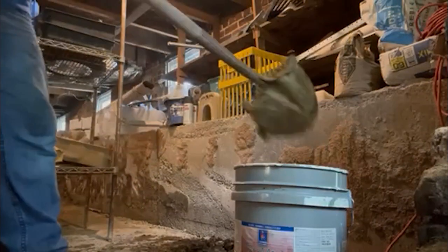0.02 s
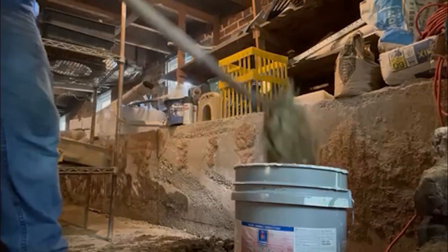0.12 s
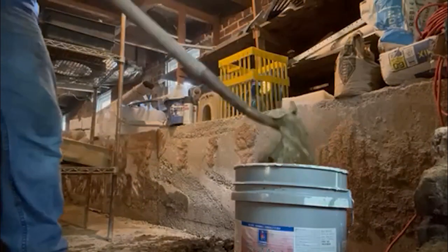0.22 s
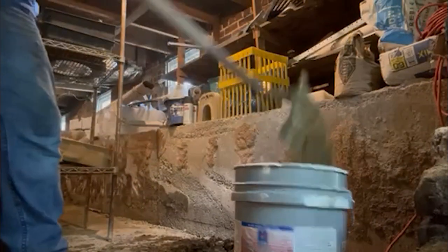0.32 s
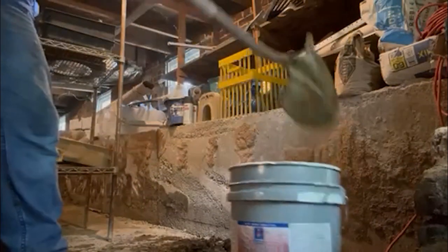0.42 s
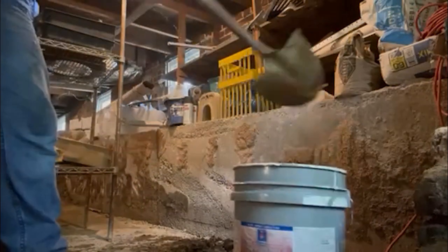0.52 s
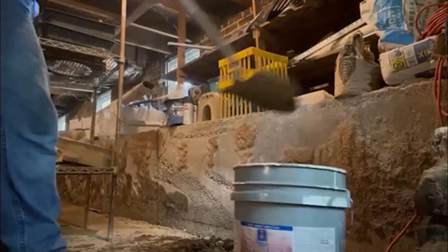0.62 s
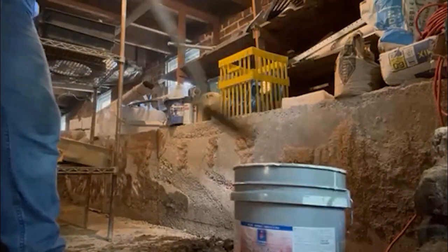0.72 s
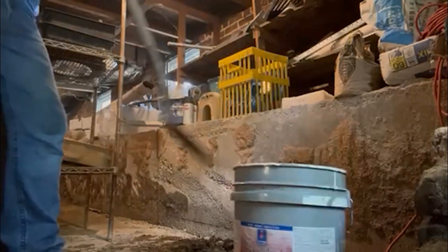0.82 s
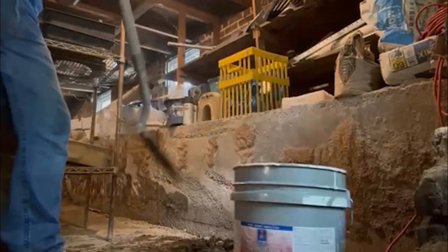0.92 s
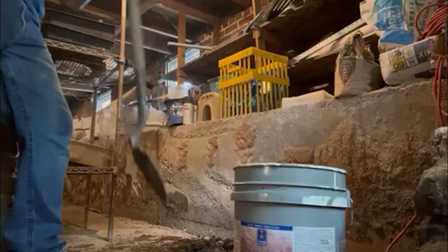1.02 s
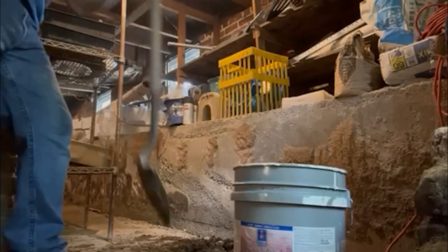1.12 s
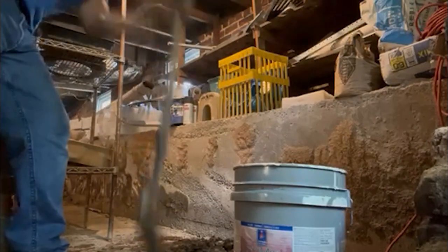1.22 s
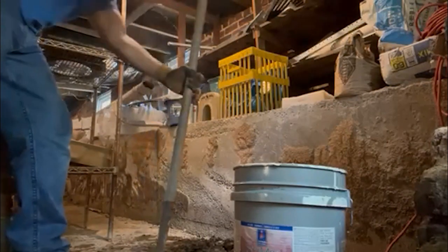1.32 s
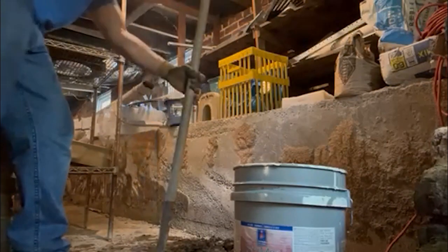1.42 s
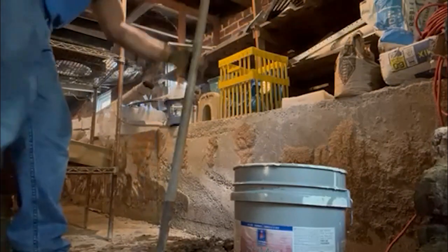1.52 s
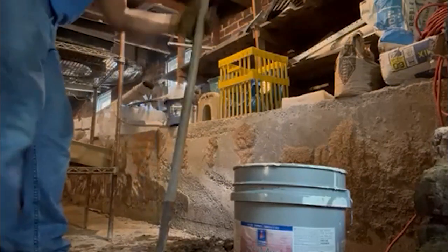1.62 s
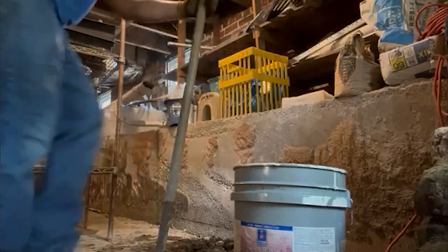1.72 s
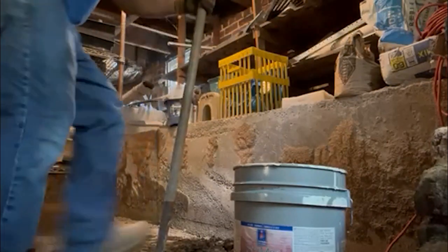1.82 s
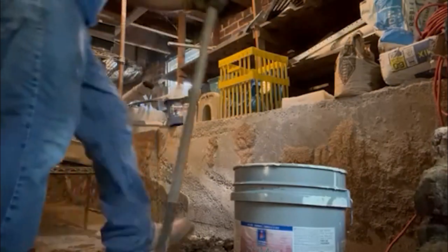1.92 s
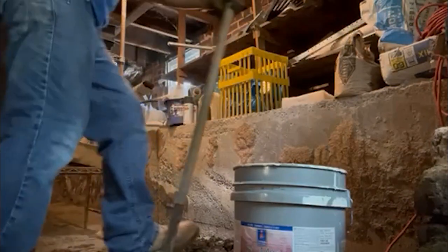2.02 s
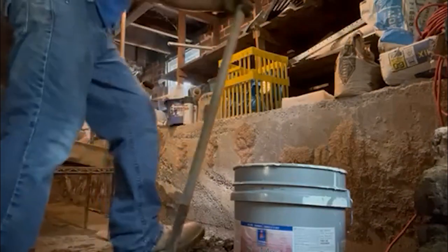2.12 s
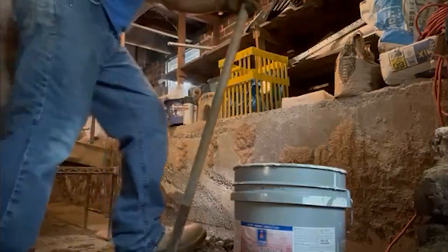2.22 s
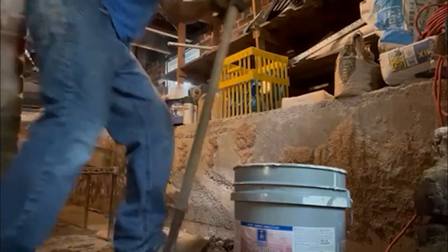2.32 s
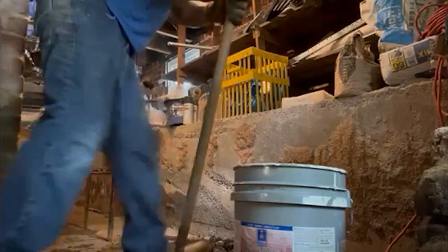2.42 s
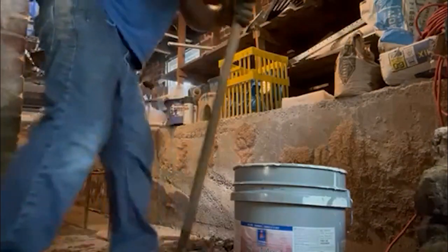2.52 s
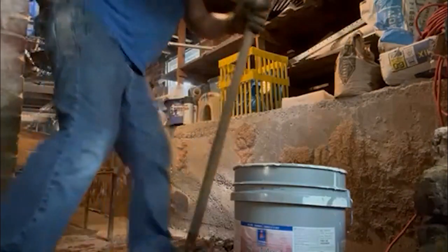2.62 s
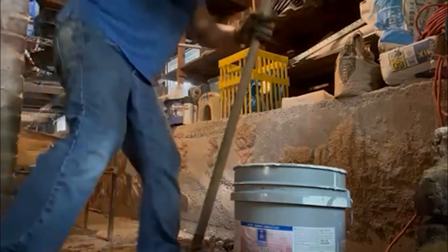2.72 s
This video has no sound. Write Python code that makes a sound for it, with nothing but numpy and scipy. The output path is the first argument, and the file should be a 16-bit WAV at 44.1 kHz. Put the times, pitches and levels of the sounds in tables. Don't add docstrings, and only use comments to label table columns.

```python
import sys
import numpy as np
from scipy import signal
from scipy.fft import rfft, irfft
from scipy.io import wavfile
from scipy.ndimage import uniform_filter1d

SR = 44100
rng = np.random.default_rng(int(sys.argv[2]) if len(sys.argv) > 2 else 0)


def voltage_ratio(level):
    return 10 ** (np.asarray(level, float) / 20)


def master(y):
    cut = np.clip(np.atleast_2d(y).T, -1, 1)
    pcm = np.round(cut * 32767)
    wavfile.write(sys.argv[1], SR, pcm.astype(np.int16))


N = 121275

# [t/s, knock level/dB, knock f/Hz, drum level/dB]
CLODS = [(0.15, -31, 770, -28.5), (0.236, -13, 640, -21.5), (0.243, -13, 785, -4), (.251, -11.5, 700, -3.5),
         (0.256, -7, 350, -4), (0.269, -5, 600, -12.5), (0.270, 0, 347, -17.5), (.289, -5.5, 670, -8),
         (0.297, -12, 600, -16.5), (0.308, -5.5, 450, -3), (0.316, -15.5, 950, -18),
         (0.324, -10, 420, -4.5), (0.33, -20, 920, -18.5), (0.339, -17.5, 1150, -26),
         (.352, -28, 500, -20.5), (.365, -13.5, 640, -23.5), (0.382, -31, 1000, -21.5),
         (0.398, -39.5, 900, -29.5), (0.448, -25.5, 650, -44), (0.466, -52, 506, -36.5),
         (.521, -19, 600, -19.5)]
# [f/Hz, level/dB, t60/s]
BUCKET_MODES = [(211.7, -1, 0.09), (274, -2.5, 0.074), (154, -27, 0.17), (419.7, -10.5, 0.054),
                (480, -9.5, 0.054)]
# [f/Hz, level/dB, t60/s]
BUCKET_AIR = (216.5, -26, .9)
# [t/s, level/dB, time until dirt smothers it/s]
BUCKET_AIR_RINGS = [
    (0.346, -5, 0.03),
    (.55, -1, 0.09),
]
SMOTHER_DB_PER_S = 500
KNOCK_CYCLES, STONE_CYCLES = 4.6, 9
CRACK_DB, CRACK_S = -13, 0.0011

# [t/s, rise/s, level/dB, fall/(dB/s), tilt/(dB/octave)]
TIP_GRIT = [
    (0.019, 0.002, -42.5, 199, -17.5),
    (0.041, 0.00086, -46.5, 1496, 2),
    (0.134, 0.017, -43, 18, -12),
    (0.23, 0.01, -23, 81, -20),
    (.29, 0.026, -30.5, 182, -13),
    (0.399, 0.047, -52, 7, -23.5),
    (0.518, 0.0054, -52, 132, -4.5),
    (0.586, 0.021, -59.5, 152, -4),
    (0.68, 0.044, -74, 38, -9.5),
]
# [t/s, rise/s, level/dB, fall/(dB/s),
# tilt/(dB/octave)]
DIG_GRIT = [(1.23, 0.004, -57.5, 24, -10), (1.743, 0.0087, -54.5, 340, -18), (0.901, 0.048, -56.5, 47, -1),
            (0.961, 0.066, -54.5, 320, -2.5), (1.256, 0.023, -16.5, 299, -3.5),
            (1.302, 0.0058, -64, 370, 0), (1.44, 0.028, -64, 100, -1), (1.621, 0.0081, -54, 67, -5),
            (1.884, 0.0055, -45, 81, -8.5), (1.929, 0.048, -48, 340, 3), (2.08, 0.0087, -61.5, 18, -4),
            (2.229, .008, -48.5, 50, -1), (2.243, 0.0024, -38.5, 132, -6), (2.288, 0.062, -28.5, 80, -5.5),
            (2.334, 0.0025, -23, 380, -0.5), (2.35, 0.0047, -43, 78, -7.5), (2.388, 0.017, -37.5, 190, -10),
            (2.462, 0.0011, -23, 1230, -18), (2.473, 0.11, -42.5, 8.3, -7), (2.638, 0.02, -53.5, 110, 3)]
# [f/Hz, level/dB, t60/s]
BURIED_BLADE = [(610, 7, 0.016), (730, 7, 0.016), (1000, 2, 0.02), (1624, -4, 0.04), (1900, -4, 0.022),
                (4740, -15, 0.08)]
# [f/Hz, level/dB, t60/s]
TIPPED_BLADE = [(465, -8, .05), (945, -4, .04), (1640, -3, .05), (1830, 0, .04), (2200, -3, .03)]
BURIED_BLADE_DB, TIPPED_BLADE_DB = -17, -20.5
GRAINS_PER_S, GRAIN_SPREAD_DB, PATCH_DB = 4300, 2.5, 3.2
CLUMP_DB, CLUMP_HZ = 1, 61
BUCKET_KNEE_HZ, GROUND_KNEE_HZ, GRIT_LOW_HZ = 2010, 700, 300

# [t/s, level/dB, f/Hz]
STONES = [(0.023, -20.5, 480), (0.025, -20, 940), (.121, -34, 1000), (.190, -26.5, 960),
          (1.259, -12.5, 1172), (1.262, -14, 368), (1.274, -3.5, 840), (1.277, -6.5, 1096),
          (1.275, -19, 3580), (1.645, -29.5, 460), (1.752, -38.5, 910), (1.887, -27.5, 840),
          (1.459, -44.5, 848), (1.933, -27, 1060), (2.286, -22, 1750), (2.308, -19, 640),
          (2.351, -7.5, 1113), (2.360, -7, 606), (2.406, -29, 613), (2.461, -13.5, 1875),
          (2.4631, -15, 1150), (2.465, -16.5, 566), (2.677, -24, 610)]
# [t/s, level/dB, f/Hz, t60/s]
CLINKS = [(.024, -31, 469.5, .15), (.040, -27.5, 5720, 0.0062), (0.0413, -32.5, 3840, 0.0063),
          (0.055, -33.5, 1645, 0.018), (.148, -36, 1310, 0.017), (.156, -36, 436.5, 0.31),
          (.234, -20, 2220, 0.011), (0.243, -16, 2010, 0.016), (.244, -6.5, 732, 0.049),
          (.249, -10.5, 1773, 0.018), (.257, -25.5, 2250, 0.067), (.268, -9, 1794, 0.018),
          (.289, -16, 2187, .03), (.290, -21, 1290, .03), (0.289, -22, 1910, 0.023),
          (.308, -13.5, 1760, 0.022), (.311, -23, 926, 0.091), (0.325, -17.5, 914, .05),
          (.384, -26.5, 1033, .05), (.521, -29.5, 860, 0.026), (.620, -42.5, 938, .04),
          (2.245, -31.5, 3320, .012), (2.334, -22, 3000, 0.027), (2.350, -24.5, 3270, 0.013),
          (2.373, -19, 712, 0.045), (2.389, -36, 700, 0.02), (2.402, -24, 900, 0.016),
          (2.418, -39, 700, 0.019), (2.455, -22, 870, 0.0085), (2.461, -23, 2800, 0.0083),
          (2.4606, -32.5, 6300, 0.0078), (2.533, -33, 640, 0.038), (2.611, -38, 1790, 0.045),
          (2.640, -39, 806, 0.019)]

# [t/s, level/dB, first f/Hz, last f/Hz, t60/s]
THUDS = [(0.159, -26, 156, 129.7, .2), (0.527, -11, 234, 217.5, 0.1), (0.249, -27.5, 110, 73.4, 0.15),
         (1.268, -14, 140, 76.6, 0.26), (1.628, -20.5, 300, 143, 0.066), (1.647, -28, 219, 121.3, 0.13),
         (1.667, -34, 94.5, 62.4, 0.31), (1.885, -20.5, 388, 212, 0.1), (1.893, -18, 146, 106.8, 0.182),
         (1.913, -16.5, 92, 76, 0.089), (2.464, -14.5, 432, 162.6, 0.15), (2.469, -11, 193, 120, 0.078),
         (1.287, -22.5, 215, 191, 0.11), (2.323, -28, 175, 150.7, 0.18), (2.485, -16.5, 232, 185, 0.08)]
SAG_S, THUD_RISE_S = 0.0057, 0.002

# [f/Hz, level/dB per Hz]
AIR = [(20, -35.5), (65, -3.5), (110, -1.5), (160, -15), (260, -14.5), (560, -35.5), (3000, -45.5),
       (11000, -50)]
# [t/s, level/dB]
DUST = [(0, 4.5), (.9, 2.5), (1.07, -3), (1.12, -14), (1.2, 1.5), (1.301, 5), (1.6, 1), (1.85, 0.5),
        (2.05, 1.5), (2.75, 12)]
# [t/s, level/dB]
HUM_SWELL = [(0, 6.5), (1.201, 1.5), (1.9, -0.5), (2.1, -8), (2.75, -11)]
AIR_DB, DUST_HZ = -49, 1200
HUM_HZ, HUM_WIDTH_HZ, HUM_DB, HUM_STEADY = 107, 12, -54, 1.7

# [f/Hz, t60/s]
CELLAR = [(80, 1), (400, 0.14), (2000, 0.21), (9000, 0.18)]
CELLAR_DB, ECHO_LOW_HZ = -6, 350

# [f/Hz, side level/dB]
SIDE_GAIN = [(60, -30), (200, -19.5), (550, -1.5), (1000, -8), (4000, -5), (6500, -7), (9000, 3),
             (11000, -7.5)]
# [f/Hz, share of mid in side]
LEFT_DIP = [(200, .1), (380, 0), (640, -.33), (1500, -.12), (4000, 0), (10000, 0), (11300, -.2)]
# [f/Hz, phase/rad]
PORT_PHASE = [(90, 0), (260, 0.4), (600, 0.6), (2500, 0.03)]
# [low f/Hz, high f/Hz, level/dB]
MID_GAP = (8700, 10100, -32)
# [low f/Hz, high f/Hz, level/dB]
SIDE_GAP = (6700, 8100, -20)
MID_TOP_HZ, SIDE_TOP_HZ, CEILING = 11950, 10700, 0.95
FILL_DB, NARROW_FROM_DB, NARROW_HZ_PER_DB = -28.5, -56, 16
WEAK_DB, LOUD_DB, WEAK_FROM_HZ = -0.3, -31, 2900


def bucket():
    out = np.zeros(N)
    drum = sum(ring(*mode, rise=0.003) for mode in BUCKET_MODES)
    for s, knock_db, hz, drum_db in CLODS:
        add(out, s, knock(hz, knock_db, KNOCK_CYCLES / hz + 0.0081) + voltage_ratio(drum_db) * drum)
    for s, db, free_s in BUCKET_AIR_RINGS:
        smother_db = SMOTHER_DB_PER_S * np.maximum(np.arange(SR // 2) / SR - free_s, 0)
        add(out, s, voltage_ratio(db - smother_db) * ring(*BUCKET_AIR, rise=0.014))
    return out


def grain_streams():
    size = 2 * N
    hits = uniform_filter1d(1.0 * (rng.random(size) < GRAINS_PER_S / SR), size=12)
    sizes = voltage_ratio(GRAIN_SPREAD_DB * np.minimum(rng.exponential(1, size), 4))
    grains = rng.standard_normal((2, size)) * (0.3 + sizes * hits)
    clumps = evened(colour(rng.standard_normal(size), lambda hz: 1 / (1 + (hz / CLUMP_HZ) ** 2)))
    return patchy(grains * voltage_ratio(CLUMP_DB * clumps))


def grit():
    grains, t, out = grain_streams(), np.arange(SR // 2) / SR, np.zeros((2, N))
    dig_s = DIG_GRIT[0][0]
    for start, rise, db, fall, tilt in TIP_GRIT + DIG_GRIT:
        knee_hz = GROUND_KNEE_HZ if start >= dig_s else BUCKET_KNEE_HZ
        part = grains[:, round(start * SR):][:, :len(t)]
        part = colour(part, lambda hz: voltage_ratio(tilt * np.log2(hz / knee_hz + 1)) / (1 + (GRIT_LOW_HZ / (hz + 1)) ** 3))
        swell = np.sin(np.pi / 2 * np.clip(t / rise, 0, 1)) ** 2
        fade = voltage_ratio(db - fall * (np.maximum(t - rise, 0) + 5.74 * t ** 2))
        add(out, start, evened(part) * swell * fade)
    buried = np.arange(N) / SR >= dig_s
    ground_ring = voltage_ratio(BURIED_BLADE_DB) * struck(out * buried, BURIED_BLADE)
    air_ring = voltage_ratio(TIPPED_BLADE_DB) * struck(out * ~buried, TIPPED_BLADE)
    return out + ground_ring + air_ring


def stones():
    out = np.zeros(N)
    for s, db, hz in STONES:
        add(out, s, knock(hz, db, STONE_CYCLES / hz + 0.0042))
    for s, db, hz, t60 in CLINKS:
        add(out, s, knock(hz, db, t60))
    return out


def thuds():
    out, t = np.zeros(N), np.arange(SR // 2) / SR
    for s, db, first_hz, last_hz, t60 in THUDS:
        turns = last_hz * t + (first_hz - last_hz) * SAG_S * (1 - np.exp(-t / SAG_S))
        envelope = voltage_ratio(db - 60 * t / t60) * (1 - np.exp(-t / THUD_RISE_S))
        add(out, s, envelope * np.sin(2 * np.pi * turns))
    return out


def cellar(x):
    taps = np.zeros((2, SR // 2))
    at = np.arange(120, SR // 2 - 20, 20) + rng.integers(0, 20, (2, (SR // 2 - 121) // 20))
    np.put_along_axis(taps, at, rng.choice([-1.0, 1.0], at.shape), 1)
    hz, t, z = signal.stft(taps, SR, nperseg=512)
    tail = signal.istft(z * voltage_ratio(-60 * t / read(CELLAR, hz)[:, None]), SR, nperseg=512)[1]
    return signal.fftconvolve(x[None], tail / np.linalg.norm(tail[0]), axes=1)[:, :N]


def basement():
    t = np.arange(N) / SR
    air = voltage_ratio(AIR_DB) * evened(colour(rng.standard_normal((2, N)), lambda hz: voltage_ratio(read(AIR, hz))))
    treble = colour(air, lambda hz: 1 / (1 + (DUST_HZ / (hz + 1)) ** 2))
    air = air + treble * (voltage_ratio(np.interp(t, *np.transpose(DUST))) - 1)
    waver = evened(colour(rng.standard_normal((2, N)), lambda hz: 1 / (1 + (2 * hz / HUM_WIDTH_HZ) ** 2)))
    turn = 2 * np.pi * HUM_HZ * t
    hum = (HUM_STEADY + waver[0]) * np.cos(turn) + waver[1] * np.sin(turn)
    air[0] += voltage_ratio(HUM_DB + np.interp(t, *np.transpose(HUM_SWELL))) * hum
    return air


def ring(hz, db, t60, rise=0.00038):
    t = np.arange(SR // 2) / SR
    return voltage_ratio(db - 60 * t / t60) * (1 - np.exp(-t / rise)) * np.sin(2 * np.pi * hz * t)


def knock(hz, db, t60):
    t = np.arange(SR // 2) / SR
    noise = uniform_filter1d(rng.standard_normal(len(t)), size=max(int(SR / hz / 8), 1))
    crack = noise * np.exp(-t / CRACK_S)
    return ring(hz, db, t60) + voltage_ratio(db + CRACK_DB) * crack / abs(crack).max()


def struck(x, modes):
    body = sum((-1) ** k * ring(*mode) / np.sqrt(mode[2]) for k, mode in enumerate(modes))
    return signal.fftconvolve(x, body[None] / np.linalg.norm(body) * 2, axes=1)[:, :N]


def patchy(x):
    z = signal.stft(x, SR, nperseg=256)[2]
    patches = uniform_filter1d(rng.standard_normal(z.shape[1:]), size=3, axis=0)
    patches = evened(uniform_filter1d(patches, size=4, axis=1))
    return signal.istft(z * voltage_ratio(PATCH_DB * patches), SR, nperseg=256)[1]


def read(points, hz):
    f, value = np.transpose(points)
    return np.interp(np.log(hz + 1), np.log(f + 1), value)


def evened(x):
    return x / np.sqrt(np.mean(x ** 2) + 1e-20)


def colour(x, gain):
    size = x.shape[-1]
    return irfft(rfft(x) * gain(np.fft.rfftfreq(size, 1 / SR)), size)


def add(mix, s, sound):
    part = mix[..., round(s * SR):][..., :sound.shape[-1]]
    part += sound[..., :part.shape[-1]]


def scene():
    blows, crunch = bucket() + stones() + thuds(), grit()
    echo = colour(cellar(blows + crunch[0]), lambda hz: 1 / (1 + (ECHO_LOW_HZ / (hz + 1)) ** 2))
    mid, other = basement() + crunch + voltage_ratio(CELLAR_DB) * echo + [blows, 0.34 * echo[1]]

    def lean(hz):
        return read(LEFT_DIP, hz) + 1j * np.tan(np.clip(read(PORT_PHASE, hz), -1.5, 1.5) / 2)

    side = colour(other, lambda hz: voltage_ratio(read(SIDE_GAIN, hz))) + colour(mid, lean)
    return np.array([mid + side, mid - side])


def thin_treble(x, gap, top_hz):
    low_hz, high_hz, db = gap
    x = colour(x, lambda hz: voltage_ratio(uniform_filter1d(-140.0 * (hz > top_hz), size=900)))
    hz, t, z = signal.stft(x, SR, nperseg=2048, noverlap=1024)
    treble = (abs(z[hz > WEAK_FROM_HZ]) ** 2).sum(axis=0)
    inset_hz = NARROW_HZ_PER_DB * np.maximum(10 * np.log10(treble + 1e-20) - NARROW_FROM_DB, 0)
    null = (hz[:, None] > low_hz + inset_hz * 0.5) & (hz[:, None] < high_hz - inset_hz)
    depth = np.where(treble < voltage_ratio(2 * FILL_DB), 1, 0.3)
    z = z * voltage_ratio(uniform_filter1d(db * 1.0 * null, size=6, axis=0) * depth)
    power = abs(z) ** 2 + 1e-20
    near = uniform_filter1d(power, size=6, axis=0)
    wide = np.exp(uniform_filter1d(np.log(power), size=120, axis=0))
    quiet = treble < voltage_ratio(2 * LOUD_DB)
    weak = (near < wide * voltage_ratio(2 * WEAK_DB)) & quiet & (hz > WEAK_FROM_HZ)[:, None]
    return signal.istft(z * ~weak, SR, nperseg=2048, noverlap=1024)[1][:N]


def top_cut(x):
    return signal.sosfilt(signal.butter(12, 12870, fs=SR, output="sos"), x)


def record(dry):
    left, right = CEILING * np.tanh(dry / CEILING)
    mid = thin_treble((left + right) / 2, MID_GAP, MID_TOP_HZ)
    side = thin_treble((left - right) / 2, SIDE_GAP, SIDE_TOP_HZ)
    return top_cut(np.array([mid + side, mid - side]))


dry = scene()
out = record(dry)
master(out)
```